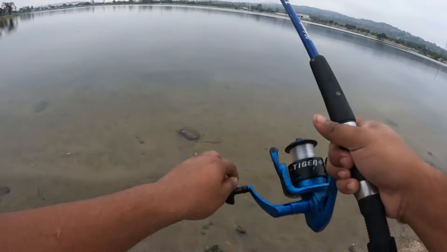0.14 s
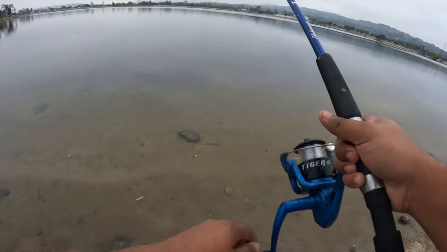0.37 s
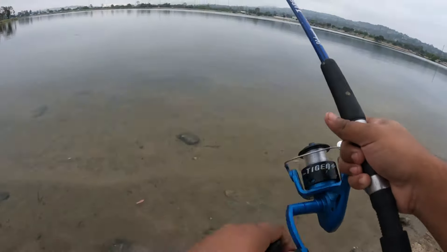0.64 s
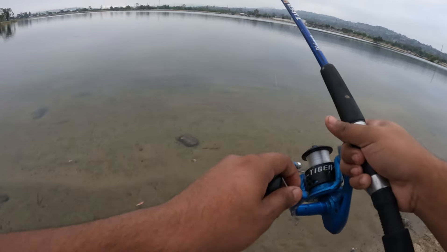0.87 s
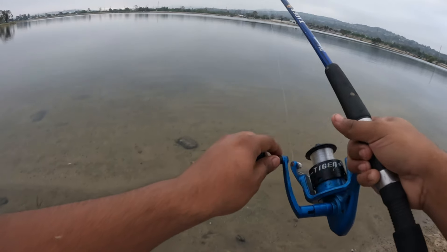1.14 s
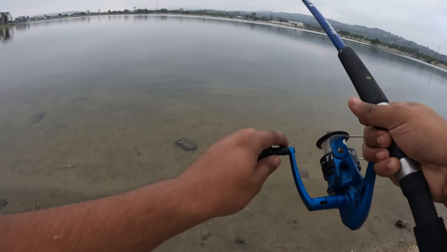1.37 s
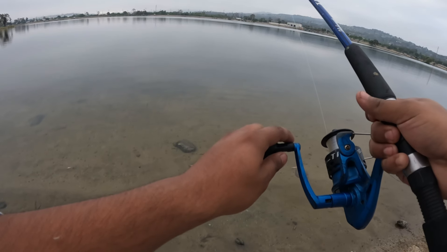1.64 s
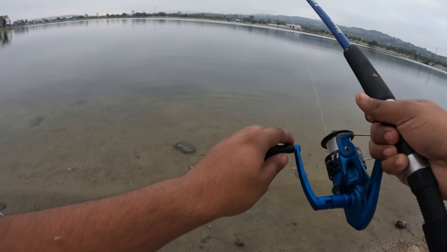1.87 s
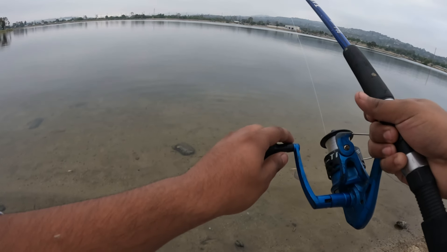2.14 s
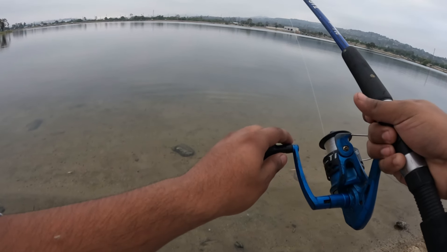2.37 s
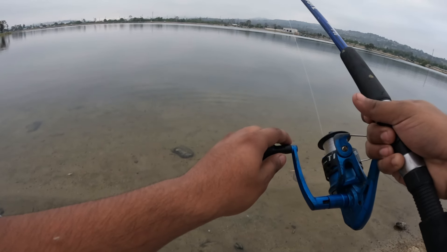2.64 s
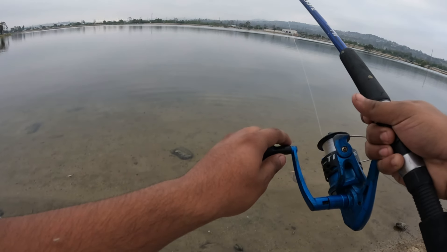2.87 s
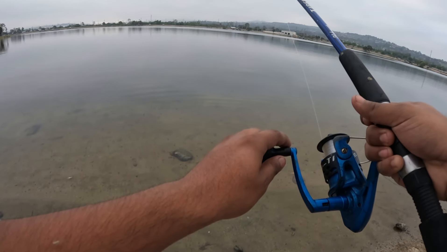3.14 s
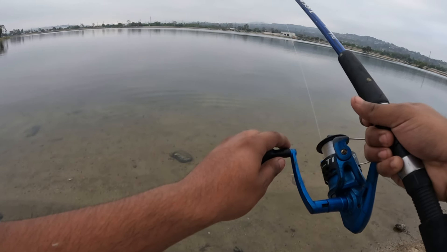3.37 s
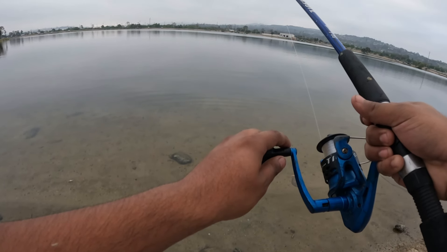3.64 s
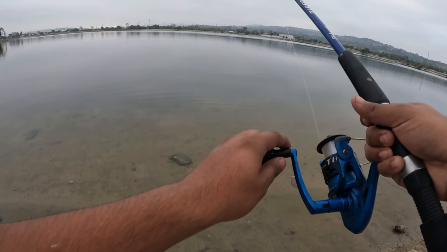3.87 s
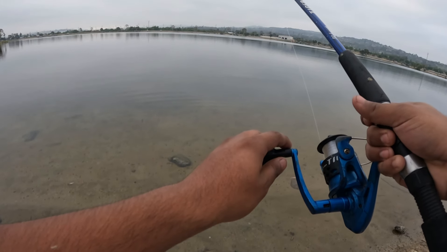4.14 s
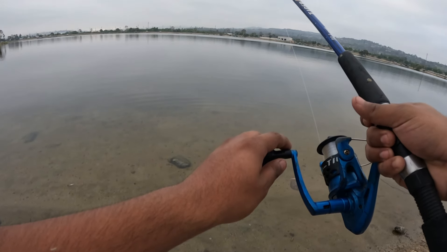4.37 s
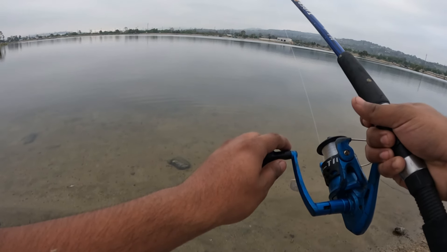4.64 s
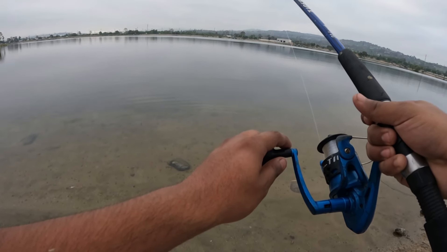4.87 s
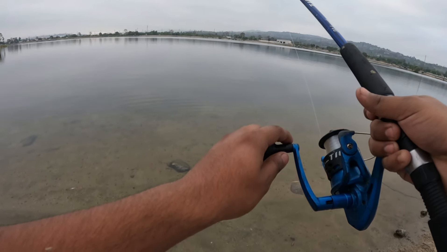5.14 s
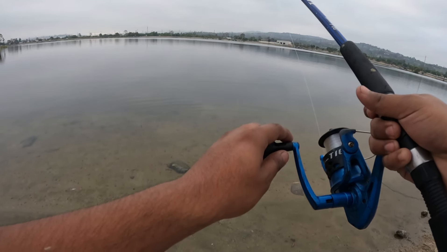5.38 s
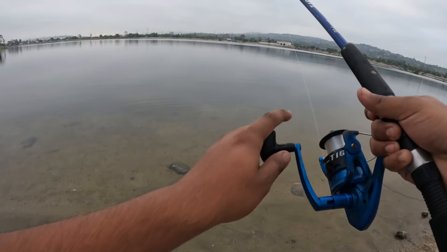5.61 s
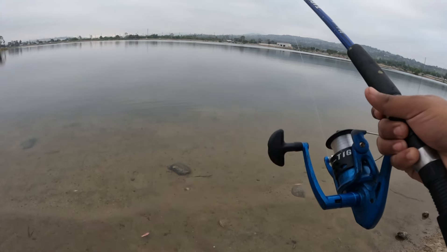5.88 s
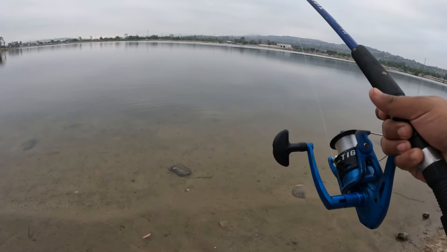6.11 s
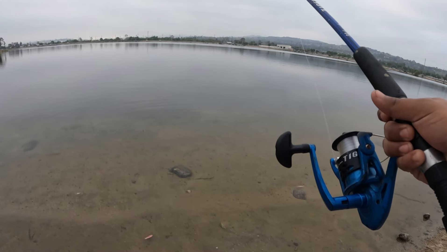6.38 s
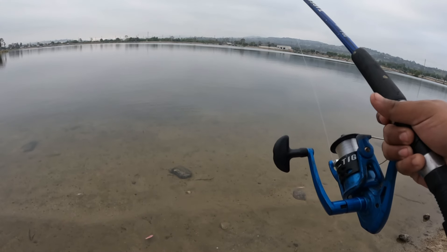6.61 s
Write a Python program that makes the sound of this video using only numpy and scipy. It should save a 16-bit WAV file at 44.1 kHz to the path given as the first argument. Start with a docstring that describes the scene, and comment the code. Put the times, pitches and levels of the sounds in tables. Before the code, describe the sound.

Brief geared reel winding with sharp clicks, then quiet lakeside rumble, repeated high bird peeps, two soft honks and three rising calls at the end.

```python
"""Far traffic drones across a calm lake shore: shaped noise and wavering engine tones, under puffs of light breeze.
Close by, a fishing reel whirrs on uneven gear teeth with line hiss, its clicks ringing modes; it all but stops,
and later a noisy rustle of handling rises near the end. Far birds twitter and chip in short gliding tones, with one
thin reel squeak; a small bird repeats an arched two-voiced peep, a water bird honks twice in nasal harmonic stacks.
At the end a near bird gives three rising calls: harmonics and breath sweeping up through fixed resonances."""
import sys
import numpy as np
from scipy import signal
from scipy.fft import rfft, irfft, next_fast_len
from scipy.io import wavfile
from scipy.ndimage import uniform_filter1d, map_coordinates

SR = 44100
rng = np.random.default_rng(int(sys.argv[2]) if len(sys.argv) > 2 else 0)


def persist_wave(psi):
    """Save psi, clipped to +-1, as 16-bit WAV."""
    counts = np.round(np.clip(psi, -1, 1) * 32767).astype(np.int16)
    wavfile.write(sys.argv[1], SR, np.atleast_2d(counts).T)


def attenuation_scalar(level_db):
    """Turn a level in dB into a linear amplitude multiplier (20 dB per decade)."""
    decades = np.asarray(level_db, float) / 20
    return 10 ** decades


N = 297675


def unit(x):
    """Scaled to rms 1."""
    return x / np.sqrt(np.mean(x ** 2) + 1e-20)


def along(points, hz):
    """Value columns of a frequency table, read on a log frequency axis."""
    f, *cols = np.transpose(points)
    return np.squeeze([np.interp(np.log(hz + 1), np.log(f + 1), c) for c in cols])


def curves(rows, t=None):
    """One value per sample for each column after the time."""
    s, *cols = np.transpose(rows)
    times = np.arange(N) / SR if t is None else t
    return [np.interp(times, s, c) for c in cols]


def wobble(rate, size=N):
    """A smooth random curve, rate knots a second."""
    knots = rng.standard_normal(int(size * rate / SR) + 4)
    return map_coordinates(knots, [np.arange(size) * rate / SR])


def filtered(x, response):
    """x times a response of frequency."""
    m = next_fast_len(N + 8192)
    return irfft(rfft(x, m) * response(np.fft.rfftfreq(m, 1 / SR)), m)[..., :N]


def rush(spectrum, width):
    """Stereo noise of rms 1, its side part set below the mid part."""
    noise = rng.standard_normal((2, N))
    mid, side = filtered(noise, lambda hz: attenuation_scalar(along(spectrum, hz) + [0 * hz, along(width, hz)]))
    return unit(np.array([mid + side, mid - side]))


def tone(hz, db):
    """A sine of the given rms level that follows a pitch curve."""
    phase = 2 * np.pi * np.cumsum(hz) / SR + rng.uniform(0, 2 * np.pi)
    return np.sqrt(2) * attenuation_scalar(db) * np.sin(phase)


def gate(t, length, attack, release):
    """Smooth attack, hold and release."""
    return np.sin(np.pi / 2 * np.clip(t / attack, 0, 1) * np.clip((length - t) / release, 0, 1)) ** 2


def add(out, s, x, pan_db=0):
    """Lays a short sound into a stereo track at time s; positive pan leans left."""
    part = out[:, round(s * SR):][:, :x.shape[-1]]
    part += (attenuation_scalar([[pan_db / 2], [-pan_db / 2]]) * x)[:, :part.shape[1]]


# swell of the traffic roar: (time [s], level [dB])
ROAR_SWELL = [(0, -42), (.3, -43), (1.2, -44.5), (3.3, -44.5), (5, -44), (6.75, -42)]
# colour of the deep rumble: (frequency [Hz], relative level [dB])
RUMBLE_COLOUR = [(12, -28), (20, 3.5), (43, 1), (114, -1.5), (152, -7.5), (184, -9.5), (252, -13),
                 (296, -17.5), (353, -19), (400, -22), (520, -33.5), (880, -120)]
# colour of the roar: (frequency [Hz], relative level [dB])
ROAR_COLOUR = [(150, -42), (260, -10.5), (331, -4), (382, -18.5), (414, -8), (463, -7.5), (502, -6.5),
               (570, -8.5), (1250, -13), (1620, -20), (2880, -35.5), (6740, -54.5), (8100, -66.5),
               (8900, -84.5), (12000, -104), (15600, -105), (22000, -120)]
# stereo width of rumble and roar: (frequency [Hz], side over mid [dB])
TRAFFIC_WIDTH = [(25, -26), (60, -31), (110, -38.5), (200, -41), (370, -23.5), (670, -13), (1230, -9),
                 (2250, -4), (4130, -3), (7550, 0)]
# how far the right port leads in the roar: (frequency [Hz], phase [rad])
ROAR_LEAD = [(300, 0), (450, 0.18), (780, 0.66), (2200, 0.42), (3400, 1), (3900, 0.15)]
# engine drones swell quickly to a turning point, then fade, hold or (negative fade) creep up:
# (pitch [Hz], turning point [s], level there [dB], swell [dB/s], fade [dB/s])
ENGINE_DRONES = [(77.5, 5.2, -33, 10.5, -1.2), (179.5, 3.9, -40.5, 15, 1.5), (236.4, 4.1, -51, 15, 0),
                 (271, 4.4, -50, 12, 4), (295.1, 3.18, -43.5, 67.5, 0.2), (327, 3.8, -50, 12, 1.5)]
RUMBLE_DB, RUMBLE_FOLLOWS = -28, 0.33  # level when the roar is at its mean; share of the roar's swings
DRONE_WAVER_HZ, DRONE_FAR_DB = 0.906, -29  # unsteady pitch; lowest level of the swell, relative to its end


def traffic():
    """Near-mono rumble, a wider roar and slightly wavering engine drones."""
    roar_db, = curves(ROAR_SWELL)
    sides = np.array([[-1], [1]])
    roar = filtered(rush(ROAR_COLOUR, TRAFFIC_WIDTH), lambda hz: np.exp(.5j * along(ROAR_LEAD, hz) * sides))
    rumble_db = RUMBLE_DB + RUMBLE_FOLLOWS * (roar_db - roar_db.mean())
    out = attenuation_scalar(rumble_db + 0.54 * wobble(1.24)) * rush(RUMBLE_COLOUR, TRAFFIC_WIDTH)
    out = out + attenuation_scalar(roar_db + 0.82 * wobble(6.6) + [[.4], [-.4]]) * roar
    for hz, s, db, swell_db, fade_db in ENGINE_DRONES:
        t = np.arange(N) / SR - s
        passing_db = np.where(t < 0, np.maximum(swell_db * t, DRONE_FAR_DB), -fade_db * t)
        out = out + tone(hz + DRONE_WAVER_HZ * wobble(5), db + passing_db + 2.0 * wobble(5))
    return out


# colour of the puffs: (frequency [Hz], relative level [dB])
BREEZE_COLOUR = [(10, -22), (22, 8), (50, 1), (100, -14.5), (150, -34.5), (300, -87.5)]
BREEZE_DB = -65.5


def breeze():
    """Light puffs of air that push the two ports in opposite ways."""
    air = unit(filtered(rng.standard_normal(N), lambda hz: attenuation_scalar(along(BREEZE_COLOUR, hz))))
    puffs = attenuation_scalar(5 * wobble(7) + 2 * wobble(.8)) * air
    return attenuation_scalar(BREEZE_DB) * unit(puffs) * np.array([[1], [-1]])


# resonances of the reel's shell: (frequency [Hz], width [Hz], relative level [dB])
SHELL_MODES = [(585, 21, 4), (1120, 41, -5.5), (1340, 34, 0.5), (1636, 40, -1.5)]
# load on the handle: (time [s], shell level [dB])
HANDLE_LOAD = [(.02, -44.5), (.11, -51.5), (.17, -47.5), (.24, -56), (.3, -47.5), (.36, -52.5), (.41, -58),
               (.5, -52), (.6, -63), (.7, -74), (.8, -110)]


def reel_shell(contacts):
    """The shell's resonances, shaken by the tooth contacts and driven by the load on the handle."""
    shell = 0
    for centre, width, db in SHELL_MODES:
        mode = filtered(contacts, lambda f: 1j * f * width / (centre * centre - f * f + 1j * f * width))
        shell = shell + attenuation_scalar(db + 3 * wobble(14)) * unit(mode)
    return attenuation_scalar(curves(HANDLE_LOAD)[0]) * unit(shell)


# the reel's whirr, and after 1.6 s the rustle of handling: (time [s], level [dB])
WHIRR_THEN_RUSTLE = [(.03, -51.5), (.16, -54.5), (.26, -55.5), (.38, -58), (.45, -56.5), (.53, -59),
                     (.63, -65), (.74, -71), (.86, -66.5), (1.02, -67.5), (1.16, -66), (1.27, -62.5),
                     (1.36, -77), (1.83, -90), (3.3, -92), (3.47, -77), (3.62, -80.5), (4.36, -99.5),
                     (5.02, -88), (5.27, -77.5), (5.96, -70), (6.08, -61.5)]
# colour of whirr and rustle: (frequency [Hz], relative level [dB])
WHIRR_COLOUR = [(900, -27.5), (1500, 0), (1900, -9), (3000, -8), (3500, -7), (3850, -6), (4190, -1.5),
                (4550, -7.5), (4870, -4), (5250, -9.5), (5600, -15), (7000, -48)]
# colour of the hiss: (frequency [Hz], relative level [dB])
HISS_COLOUR = [(4500, -36), (5800, 2), (7600, -0.5), (8300, -9.5), (10200, -12), (12000, -20.5),
               (14500, -38)]
TEETH_PER_S, TEETH_DB = 600, 1  # mean rate of uneven contacts; their level against the smooth noise
HISS_DB, HISS_FOLLOWS = -76.5, 0.7  # hiss when the whirr or rustle is at -68.5 dB; share of its swings


def whirr_then_rustle():
    """Whirr roughened by gear teeth, with shell and line hiss; the same noises later serve as handling rustle."""
    level_db, = curves(WHIRR_THEN_RUSTLE)
    hiss_db = HISS_DB + HISS_FOLLOWS * (level_db + 68.5)
    width = [(1500, -10.0), (4500, -22.0), (9000, -3.0)]  # (frequency [Hz], side over mid [dB])
    contacts = (rng.random(N) < TEETH_PER_S / SR) * attenuation_scalar(3.9 * rng.standard_normal(N))
    rough = unit(filtered(contacts, lambda hz: attenuation_scalar(along(WHIRR_COLOUR, hz))))
    smooth = attenuation_scalar(0.88 * wobble(500) + 1.1 * wobble(40)) * rush(WHIRR_COLOUR, width)
    body = unit(smooth + attenuation_scalar(TEETH_DB) * rough)
    hiss = unit(attenuation_scalar(2.2 * wobble(200) + 3.1 * wobble(25)) * rush(HISS_COLOUR, width))
    mix = attenuation_scalar(level_db) * body + reel_shell(contacts) + attenuation_scalar(hiss_db) * hiss
    return attenuation_scalar([[-1.2], [1.2]]) * mix


# reel clicks, rung 7 dB below the listed level:
# (time [s], level [dB], brightness [dB], left over right [dB])
REEL_CLICKS = [(.068, -40.5, 3, 2.5), (.088, -37.5, 2, -1), (0.122, -35, -7, -5), (0.147, -35.5, -3, 2),
               (0.1986, -23, 12, 5), (0.2014, -17, 0.5, -4), (0.205, -29.5, 0, 0.5), (0.2423, -40, -14, 0),
               (0.309, -44, -8, -5), (.416, -48, -10, -3), (0.458, -39, -9, 1.5), (.557, -56, -8, 4),
               (0.603, -42.5, -8, 0), (0.7835, -31.5, -12.5, -3.5), (2.2742, -58.5, -1.5, 9),
               (3.51, -64.5, 9, 16), (5.74, -52, 3, 3), (5.785, -50, 2, -1), (6.025, -50, 2, -6)]
# ringing modes of the reel: (frequency [Hz], relative level [dB], t60 [s])
REEL_MODES = [(2870, -7, 0.0047), (3600, -5.5, 0.012), (4130, 3.5, 0.0081), (4480, 6, 0.0057),
              (4870, -8, .007), (7220, -6, 0.0051), (8400, -2, 0.0039), (10300, -12, 0.0048),
              (13000, -17, .003)]


def reel_clicks():
    """Each click rings the reel's modes, which die away in milliseconds."""
    out = np.zeros((2, N))
    t = np.arange(SR // 30) / SR
    for s, db, bright_db, pan_db in REEL_CLICKS:
        ring = 0
        for hz, level, t60 in REEL_MODES:
            # brightness lifts the high modes and lowers the deepest
            tilt_db = bright_db * ((hz > 6000) - 1.0 * (hz < 3000))
            mode_db = level + tilt_db + rng.normal(0, 1.2, (2, 1)) - 60 * t / t60
            ring = ring + attenuation_scalar(mode_db) * np.sin(2 * np.pi * hz * t)
        onset = 1 - np.exp(-t / .0002)
        add(out, s, attenuation_scalar(db - 7) * ring * onset, pan_db)
    return out


# faint far notes and, at 1.23 s, a thin high squeak of the reel:
# (time [s], length [s], first pitch [Hz], last pitch [Hz], level [dB])
FAINT_NOTES_AND_SQUEAK = [(1.057, .088, 3560, 3460, -64), (0.523, 0.021, 6040, 5900, -65),
                          (1.155, 0.15, 6680, 6660, -80), (1.23, 0.11, 7700, 7550, -74),
                          (1.466, .025, 4150, 4300, -76), (1.57, 0.027, 6500, 5770, -77),
                          (1.585, .025, 6500, 5900, -78), (2.128, 0.043, 3840, 4300, -75.5),
                          (2.312, 0.03, 3620, 4300, -73), (2.548, 0.035, 3220, 4300, -75),
                          (2.738, 0.033, 3310, 4300, -73), (2.763, 0.018, 4300, 4350, -73),
                          (2.826, 0.07, 3520, 3480, -71), (3.06, .062, 4700, 4600, -78),
                          (3.255, .059, 4540, 4350, -77), (3.352, 0.049, 4300, 4360, -75),
                          (3.75, 0.059, 3600, 3600, -71), (4.552, 0.021, 4140, 3900, -68),
                          (4.565, 0.013, 5400, 5170, -70), (4.673, .19, 2860, 2510, -66),
                          (4.738, .022, 4200, 4280, -76), (4.805, .022, 4700, 4300, -77),
                          (4.902, 0.019, 4200, 4150, -72), (5.103, 0.026, 4700, 5300, -74),
                          (6.245, 0.086, 7650, 6950, -72)]
# one bird's even series of a falling chip:
# (first time [s], spacing [s], length [s], first pitch [Hz], last pitch [Hz])
CHIP_SERIES = (.752, .1246, .036, 4600, 3880)
# each chip of that series: (level [dB])
CHIP_SERIES_DB = [-72, -73, -66, -79, -69, -67, -71, -78]
TWITTER_PER_S, TWITTER_HZ, TWITTER_DB, TWITTER_S = 14, 4300, -90.5, 0.042  # means; each note's length
NOTE_WAVER_HZ = 35


def faint_notes_and_squeak():
    """Diffuse far twitter, short far chips and a reel squeak, each a gliding, fluttering tone."""
    out = np.zeros((2, N))
    twitter = []
    for k, (a, b, c, d) in enumerate(rng.standard_normal((round(TWITTER_PER_S * N / SR), 4))):
        start = k / TWITTER_PER_S + 0.024 * abs(a)
        twitter.append((start, TWITTER_S, TWITTER_HZ + 300 * b, TWITTER_HZ + 300 * c, TWITTER_DB + 3 * d))
    first_s, spacing, *glide = CHIP_SERIES
    series = [(first_s + k * spacing, *glide, db) for k, db in enumerate(CHIP_SERIES_DB)]
    for s, length, first_hz, last_hz, db in twitter + FAINT_NOTES_AND_SQUEAK + series:
        u = np.arange(round(length * SR)) / (length * SR)
        hz = first_hz + (last_hz - first_hz) * u + NOTE_WAVER_HZ * wobble(90, len(u))
        note = np.sin(np.pi * u) ** 0.73 * tone(hz, db + 3.2 * wobble(180, len(u)))
        add(out, s, note, rng.normal(.8, 3))
    return out


# how fast the echoes off water and bank die: (frequency [Hz], t60 [s])
SHORE_DECAY = [(1000, 0.17), (4000, 0.11), (10000, 0.18)]


def shore(x):
    """Each frequency of the echoes dies at its own speed."""
    hz, t, z = signal.stft(rng.standard_normal((2, SR // 3)), SR, nperseg=256)
    tail = signal.istft(z * attenuation_scalar(-60 * t / along(SHORE_DECAY, hz)[:, None]), SR, nperseg=256)[1]
    late = np.pad(x, ((0, 0), (200, 0)))
    return signal.fftconvolve(late, tail / np.linalg.norm(tail[0]), axes=1)[:, :N]


# small bird: (time [s], length [s], top pitch [Hz], starting overtone level [dB], starting fundamental level [dB])
SMALL_BIRD_PEEPS = [(1.317, .12, 3540, -78, -65), (1.874, 0.14, 3670, -77, -82),
                    (2.177, 0.1, 3600, -72, -72.5), (2.874, 0.16, 3650, -69, -68),
                    (3.054, 0.076, 3410, -74, -85), (3.202, 0.085, 3520, -70, -70),
                    (3.379, 0.095, 3550, -70, -68.5), (3.59, 0.11, 3470, -66, -67),
                    (3.789, 0.093, 3510, -68, -65), (3.974, .11, 3540, -69, -65.5),
                    (4.166, 0.11, 3490, -68.5, -67.5), (4.368, .11, 3500, -68, -65.5),
                    (4.559, .115, 3510, -68, -65.5), (4.803, 0.14, 3600, -71.5, -64.5),
                    (5.017, 0.13, 3490, -68.5, -66), (5.244, 0.134, 3510, -67, -65),
                    (5.482, 0.14, 3480, -68, -64), (5.729, 0.12, 3540, -65.5, -64)]
LIFT_HZ, LIFT_S, CREST_S = 625, 0.011, 0.036  # a peep slides up to its top, reached at the crest
FALL_HZ, END_DROP_HZ = 200, 270  # after the crest all sag, then drop at the end
USUAL_TOP_HZ, SLIP_PER_TOP, SLIP_S = 3470, 0.8, .024  # after the crest tops slip towards the usual pitch
PEEP_ATTACK_S, PEEP_RELEASE, LOW_ATTACK_S = 0.0029, 0.06, 0.012  # release as share of length; late fundamental
WAVER_HZ = 12  # no arch is quite smooth
OVERTONE_FADE_DB, LOW_FADE_DB = 6.5, 14  # over the fall
SPLIT_HZ, SPLIT_FROM, SECOND_DB = 180, .3, -3.5  # at the fundamental; share of the fall; against the first voice


def small_bird():
    """Arched peeps with an octave; the second side of the voice box drifts flat as each one falls."""
    out = np.zeros((2, N))
    for s, length, top_hz, over_db, low_db in SMALL_BIRD_PEEPS:
        t = np.arange(round(length * SR)) / SR
        fallen = np.clip((t - CREST_S) / (length - CREST_S), 0, 1)
        slipped = 1 - np.exp(-(np.maximum(t - CREST_S, 0) / SLIP_S) ** 2)
        slip_hz = SLIP_PER_TOP * (top_hz - USUAL_TOP_HZ) * slipped
        lift_hz = LIFT_HZ * np.exp(-CREST_S / LIFT_S) - LIFT_HZ * np.exp(-t / LIFT_S)
        arch_hz = top_hz + lift_hz - slip_hz - FALL_HZ * fallen ** 1.1 - END_DROP_HZ * fallen ** 6
        hz = uniform_filter1d(arch_hz, 200, mode="nearest") + WAVER_HZ * wobble(30, len(t))
        shape = gate(t, length, PEEP_ATTACK_S, PEEP_RELEASE * length)
        flutter = [0.75 * wobble(65, len(t)) for voice in range(3)]
        first = tone(2 * hz, over_db - OVERTONE_FADE_DB * fallen + flutter[0])
        second_db = over_db + SECOND_DB - 8 * fallen ** 4 + flutter[1]
        second = tone(2 * (hz - SPLIT_HZ * np.sqrt(fallen)), second_db)
        second = np.clip((fallen - SPLIT_FROM) / .2, 0, 1) * second
        low = np.clip(t / LOW_ATTACK_S, 0, 1) * tone(hz, low_db - LOW_FADE_DB * fallen + flutter[2])
        add(out, s, shape * (first + second), -1.2)
        add(out, s, shape * low, 1.5)
    return out


# water bird: (time [s], length [s], pitch [Hz], level [dB], lift of the overtones above the third [dB])
WATER_BIRD_HONKS = [(1.643, 0.066, 730, -47.5, -10), (4.073, 0.064, 734, -43.5, -3.5)]
# nasal harmonics: (multiple of the pitch, relative level [dB])
HONK_HARMONICS = [(1, 0.5), (2, 8), (3, -12), (4, -25.5), (5, -15.5), (6, -18.5), (7, -25), (8, -39.5)]
HONK_ATTACK_S, HONK_RELEASE_S, HONK_FADE_DB_PER_S = .028, .024, 60
HONK_ARCH_HZ, HONK_ARCH_S, HONK_END_DROP_HZ = 30, 0.0074, 75  # slides up to its pitch, then drops


def water_bird():
    """Two nasal honks: harmonic stacks on one shared, arching pitch."""
    out = np.zeros((2, N))
    for s, length, pitch_hz, db, upper_db in WATER_BIRD_HONKS:
        t = np.arange(round(length * SR)) / SR
        hz = pitch_hz - HONK_ARCH_HZ * np.exp(-t / HONK_ARCH_S) - HONK_END_DROP_HZ * (t / length) ** 3.2
        fading_db = db - HONK_FADE_DB_PER_S * t
        honk = sum(tone(k * hz, fading_db + level + upper_db * (k > 3)) for k, level in HONK_HARMONICS)
        add(out, s, gate(t, length, HONK_ATTACK_S, HONK_RELEASE_S) * honk, 1.5)
    return out


# near bird: (start [s], end [s], attack [s], opening scoop [Hz], hoarseness [dB])
RISING_CALLS = [(6.13, 6.2355, 0.08, -300, 5), (6.353, 6.499, 0.016, -11, 1.5),
                (6.609, 6.755, 0.011, -9.5, 0.5)]
# every rising call ends alike: (time from the end [s], pitch [Hz], effort [dB])
CALL_SWEEP = [(-.145, 978, -26), (-.11, 995, -16), (-.085, 1082, -12), (-.065, 1263, -6), (-.05, 1369, -5),
              (-.037, 1686, -6.5), (-.025, 1830, -1), (-.012, 2042, -8), (0, 2150, -4.5)]
# the voice's harmonics: (multiple of the pitch, relative level [dB])
CALL_HARMONICS = [(1, -3), (2, 5.5), (3, -1), (4, -4), (5, -3), (6, -5), (7, -7.5), (8, -6.5), (9, -20),
                  (10, -30.5), (11, -17), (12, -10)]
# colour on the way to each microphone port: (frequency [Hz], left gain [dB], right gain [dB])
CALL_PATH = [(875, -23, -31), (1740, -32, -48), (2230, -30.5, -34), (2340, -31.5, -36), (2680, -30.5, -43),
             (3050, -22.5, -22), (3230, -33.5, -37.5), (3600, -31.5, -38.5), (4150, -29.5, -26.5),
             (4500, -31.5, -30.5), (4780, -30.5, -29.5), (5090, -41.5, -38), (5500, -38, -39.5),
             (5900, -30.5, -29), (6400, -36, -36), (6950, -33.5, -30.5), (7300, -42, -44.5),
             (7800, -37.5, -40), (8170, -38.5, -38.5), (8470, -64, -50), (9540, -51, -46),
             (11200, -48, -66), (13000, -59.5, -75), (15000, -78.5, -92)]
SCOOP_S, RISE_RELEASE_S = .02, 0.011
PORT_LEAD_S, WATER_S = .000015, 0.0058  # half the lead of the left port; detour off the water


def near_bird():
    """Harmonic stacks sweeping up through fixed resonances, clean at first and rough at full effort."""
    out = np.zeros((2, N))
    for start, end, attack, scoop_hz, hoarse_db in RISING_CALLS:
        t = np.arange(round((end - start) * SR)) / SR
        hz, db = curves(CALL_SWEEP, t + start - end)
        jitter = .016 * attenuation_scalar(db / 2) * wobble(300, len(hz))
        hz = uniform_filter1d(hz + scoop_hz * np.exp(-t / SCOOP_S), 250, mode="nearest") * (1 + jitter)
        purer_db = 13 * np.log2(hz / 1400)  # the higher the pitch, the more the second partial rules
        stack = 0
        for k, level in CALL_HARMONICS:
            rough_db = 0.7 * k * attenuation_scalar(db / 2 + hoarse_db) * wobble(350, len(hz))
            partial = tone(k * hz, db + level + purer_db * ((k == 2) - .5) + rough_db)
            stack = stack + partial * (k * hz < 15000)
        breath = attenuation_scalar(.9 * db - 5 + hoarse_db) * np.diff(rng.standard_normal(len(hz) + 2), 2)
        add(out, start, gate(t, end - start, attack, RISE_RELEASE_S) * (stack + breath))

    def arrival(hz):
        """The sound reaches the left port a little early, and both once more off the water."""
        lead = np.exp(2j * np.pi * hz * PORT_LEAD_S * np.array([[1], [-1]]))
        return lead * (1 + attenuation_scalar(-13.0) * np.exp(-2j * np.pi * hz * WATER_S))

    return filtered(out, lambda hz: attenuation_scalar(along(CALL_PATH, hz)) * arrival(hz))


def scatter(x, t60, delay):
    """A short dense burst of reflections, different at each port."""
    t = np.arange(round(t60 * SR)) / SR
    burst = rng.standard_normal((2, len(t))) * attenuation_scalar(-60 * t / t60)
    late = np.pad(x, ((0, 0), (round(delay * SR), 0)))
    return signal.fftconvolve(late, burst / np.linalg.norm(burst[0]), axes=1)[:, :N]


BANK_S, BANK_DB = 0.096, -28  # delay and level of the far bank's echo
NEAR_GROUND_S, NEAR_GROUND_DB = .035, -5  # t60 and level of the scatter off reeds and ground


def ground_and_bank(x):
    """Dense scatter off reeds and ground at once, then a dulled echo off a far bank."""
    bank = filtered(scatter(x, 0.032, BANK_S), lambda hz: 1 / (1 + (hz / 4500) ** 4))
    return x + attenuation_scalar(NEAR_GROUND_DB) * scatter(x, NEAR_GROUND_S, 0.000988) + attenuation_scalar(BANK_DB) * bank


def scene():
    """Birds and squeak in the shore's echoes, the small bird the wettest; whirr, rustle and clicks dry and near."""
    near = ground_and_bank(near_bird())
    small = small_bird()
    faint = faint_notes_and_squeak() + water_bird()
    echoes = shore(attenuation_scalar(-10.0) * near + attenuation_scalar(-8.5) * small + attenuation_scalar(-10.0) * faint)
    return traffic() + breeze() + whirr_then_rustle() + reel_clicks() + near + small + faint + echoes


def low_pass(x):
    """Removes everything above the highest recorded frequency."""
    return signal.sosfilt(signal.butter(12, 14420, fs=SR, output="sos"), x)


def record(dry):
    """A small camera's steep low cut near 21 Hz thins the deepest rumble."""
    mix = filtered(dry, lambda hz: 1 / np.sqrt(1 + (22 / (hz + 1)) ** 8))
    return low_pass(mix)


dry = scene()
out = record(dry)
persist_wave(out)
```